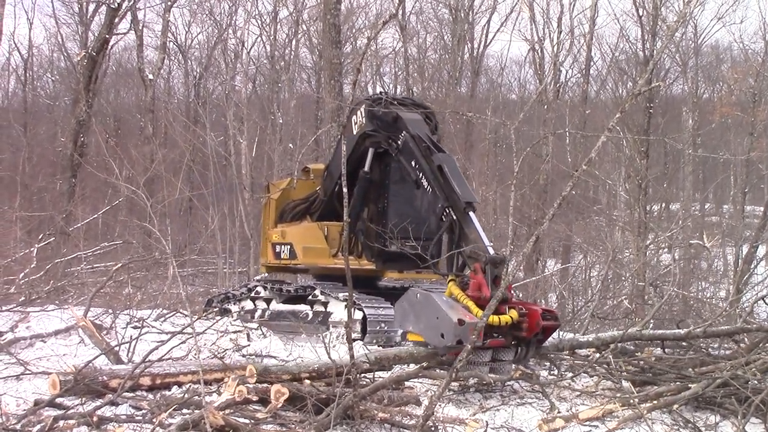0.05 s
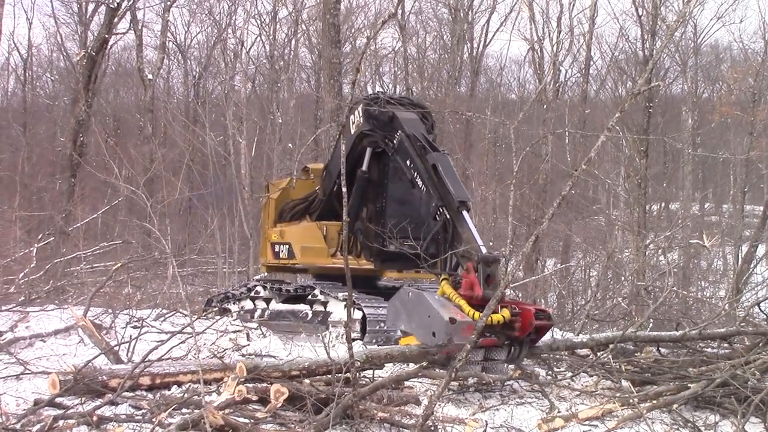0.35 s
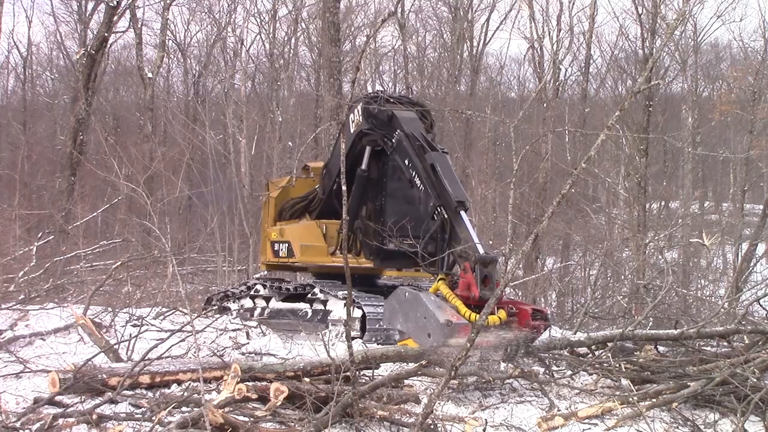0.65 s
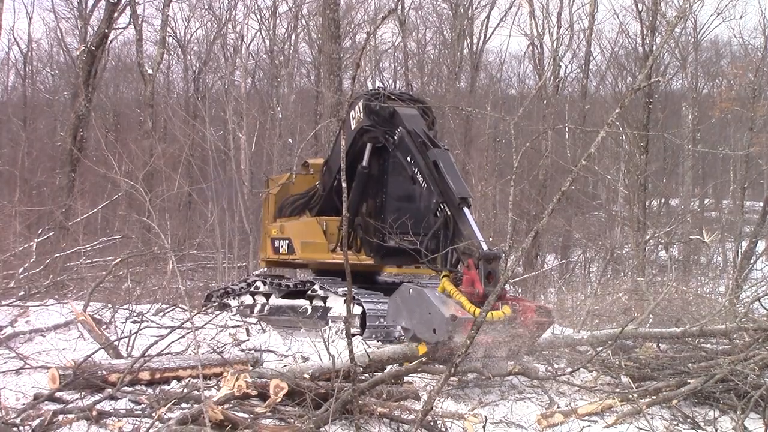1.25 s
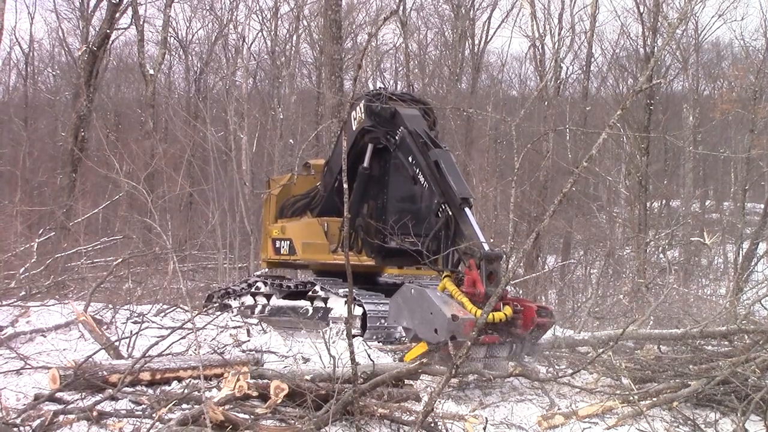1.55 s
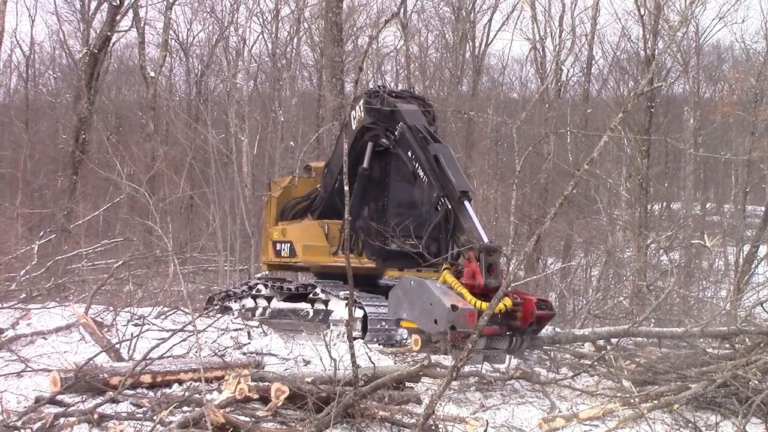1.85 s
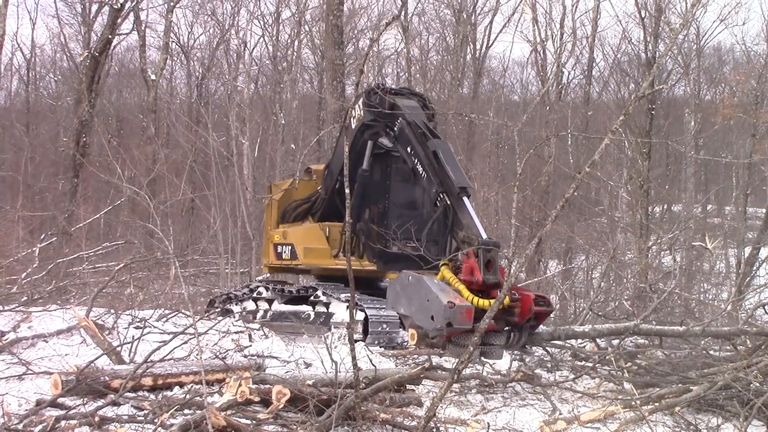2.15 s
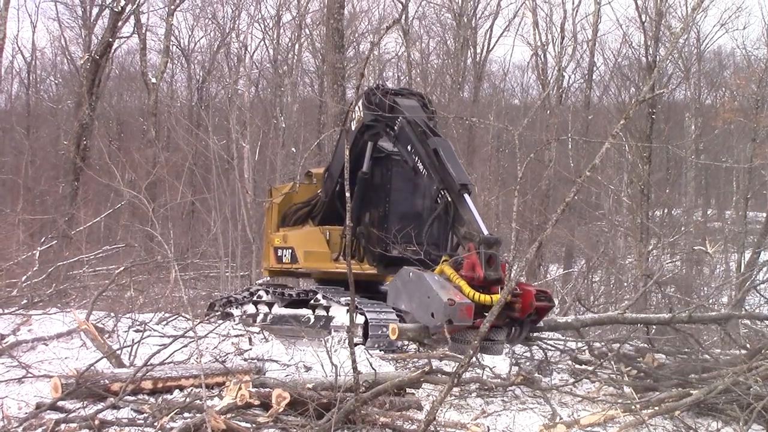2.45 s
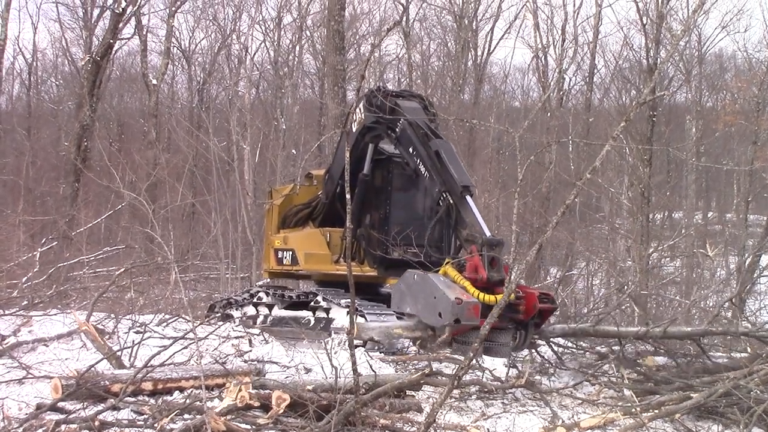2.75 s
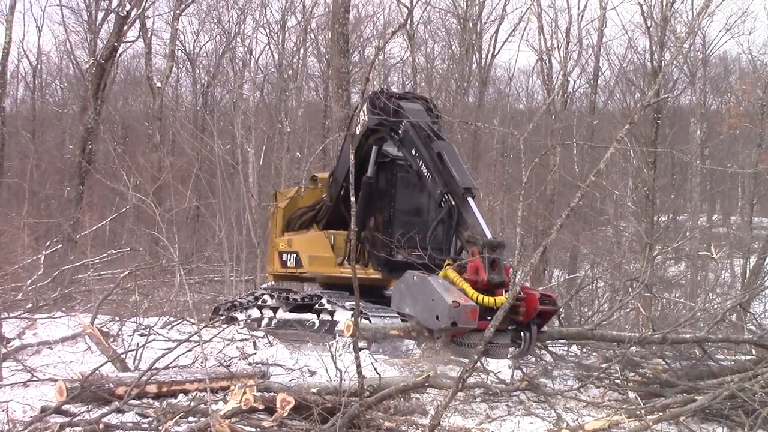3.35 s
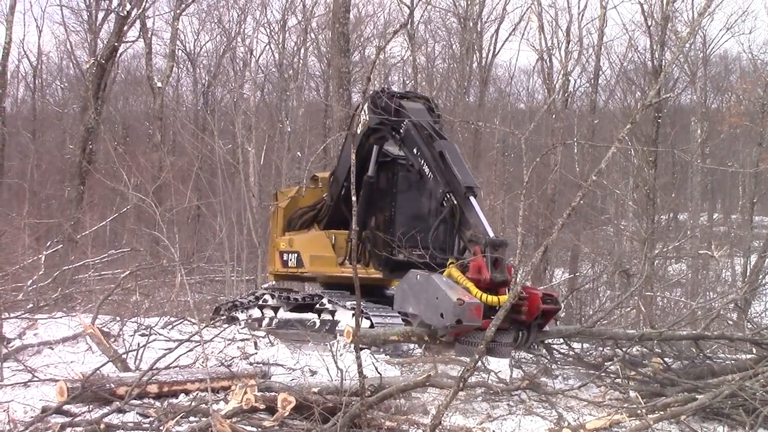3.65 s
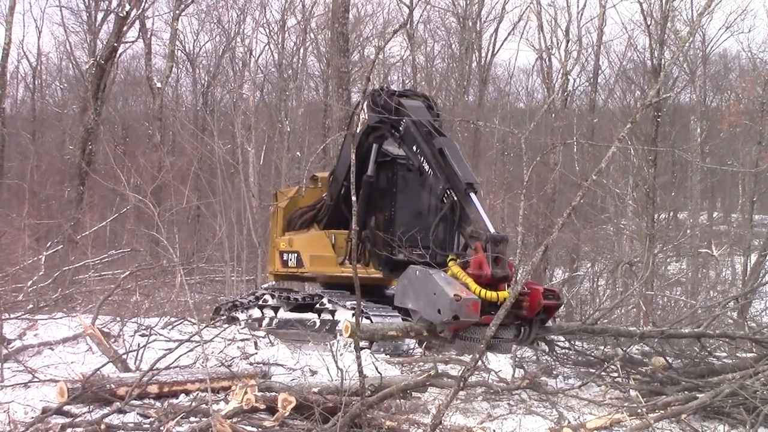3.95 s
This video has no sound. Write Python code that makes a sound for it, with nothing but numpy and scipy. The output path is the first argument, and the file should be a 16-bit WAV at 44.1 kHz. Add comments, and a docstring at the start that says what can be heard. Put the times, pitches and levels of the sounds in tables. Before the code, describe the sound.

A tree harvester saws a trunk some way off outdoors, its diesel engine clattering and droning throughout. The chain saw rasps, whines loudest from 0.6 to 1.4 seconds and runs down by 2; a log thumps softly near 1.3. From 2.3 seconds bark scrapes, limbs crunch and twigs snap sharply, densest before 3, echoing faintly. A faint hydraulic whistle and thin squeaks, about four a second, accompany the stripping.

```python
"""At a forest edge, some way off, a tracked harvester cuts up a tree. Its chain saw whines through
the trunk, throws chips and runs down, and the cut log thumps to the ground. Then rollers feed the
trunk through the knives: bark scrapes, limbs crunch, twigs snap, oil whistles in the valves and
something squeaks thinly about four times a second. The diesel engine clatters and drones
all the while, and the trees give a faint echo."""
import sys
import numpy as np
from scipy import signal
from scipy.fft import rfft, irfft, next_fast_len
from scipy.io import wavfile
from scipy.ndimage import map_coordinates

SR = 44100
rng = np.random.default_rng(int(sys.argv[2]) if len(sys.argv) > 2 else 0)


def to_wav(s):
    """Save 16-bit WAV."""
    ch = np.atleast_2d(s).T  # columns
    pcm = np.round(np.clip(ch, -1, 1) * 32767)  # PCM
    wavfile.write(sys.argv[1], SR, pcm.astype(np.int16))


N = 176400  # 4 seconds

# bark scraping through the knives: time_s, level_db
FEED_LEVEL = [(1.9, -30.5), (2.1, -35.5), (2.28, -36.5), (2.44, -25.5), (2.53, -25.5), (2.62, -23.5),
              (2.75, -26), (2.81, -23.5), (2.97, -23.5), (3.08, -25), (3.18, -24), (3.34, -22.5),
              (3.42, -26), (3.5, -21.5), (3.62, -19.5), (3.7, -26.5), (3.83, -30), (4, -35.5)]


def chain_saw():
    """The cutters whine at the rate they pass, tear the wood, ring the saw's bar and spray chips."""
    # the running chain: time_s, cutters_per_s, whine_db
    chain = [(0, 322, -35), (.15, 345, -29), (.24, 368, -34), (.36, 356, -31), (.44, 297, -30),
             (.5, 297, -26), (.545, 335, -30), (.57, 350, -16.5), (.66, 368, -16), (.87, 376, -14.5),
             (.96, 380, -16.5), (1.0, 380, -22.5), (1.21, 386, -26.5), (1.27, 398, -20),
             (1.355, 418, -18.5), (1.37, 420, -38), (1.52, 400, -28), (1.56, 345, -33), (1.61, 292, -29),
             (1.68, 275, -44), (2.0, 220, -70)]
    # the whine's tones at 1, 2, 3 and 4 times the cutter rate: gain_db
    harmonics = [-22, 0, -14.5, -19]
    # wood tearing in the cut: time_s, level_db
    cut_level = [(0, -24.5), (.15, -20), (.32, -20.5), (.45, -17.5), (.93, -18), (1.02, -26), (1.13, -25),
                 (1.25, -23), (1.45, -22.5), (1.55, -27.5), (1.78, -31.5), (1.95, -36), (2.08, -47.5),
                 (2.3, -42)]
    # tone of the tearing: pitch_hz, gain_db
    cut_tone = [(150, -28), (400, -25), (600, -5), (800, -6), (920, -5.5), (1100, 0), (1350, -5),
                (1700, -2.5), (2200, -1.5), (2800, 0), (3700, -6.5), (4500, -10.5), (7000, -3.5),
                (16000, -52)]
    # ringing of the bar and its housing: pitch_hz, width_hz, gain_db
    bar_rings = [(440.6, 16.6, -2.5), (591, 21, 2), (696, 50, -2), (830.5, 15.7, 4.5), (1106, 43, 0),
                 (1592, 100, 0), (1940, 55, -17)]
    # hiss of chain and chips: time_s, relative_db
    spray_level = [(0.0, -19.5), (0.09, -19), (0.13, -14), (0.27, -11), (0.48, -19), (0.62, -12),
                   (0.95, -14.5), (1.01, -22), (1.13, -25.5), (1.41, -19), (1.61, -28.5), (1.72, -25.5),
                   (1.775, -20), (1.81, -25), (1.99, -34.5), (2.12, -60)]
    # tone of that hiss: pitch_hz, gain_db
    spray_tone = [(1000, -53), (3000, -7.5), (4700, -10.5), (5700, -3), (6900, -1.5), (7500, 0), (8900, 2),
                  (11300, -3), (13000, -12), (16000, -17)]
    # harsh rasp as the cutters bite in and break through: time_s, level_db
    rasp_level = [(0, -42), (.32, -28), (.39, -17), (.44, -14.5), (.5, -60.5), (.95, -24.5), (1.1, -28),
                  (1.3, -28), (1.42, -25), (1.53, -34), (1.68, -27), (2.0, -49), (2.3, -80)]
    # ringing in the rasp: pitch_hz, width_hz, gain_db
    rasp_rings = [(1370, 360, -5), (1890, 144, 1.5), (2350, 130, 3), (2650, 650, -3.5), (3550, 460, -2.5)]
    sing_hz, sing_width_hz, sing_db = 1578, 44, 18.5
    rate = curve(chain)
    phase = 2 * np.pi * np.cumsum(rate * (1 + .007 * wobble(70.1))) / SR
    whine = np.zeros(N)
    for k, db in enumerate(harmonics, 1):
        # the bar sings along when a tone comes near its own pitch
        boost_db = sing_db / (1 + ((k * rate - sing_hz) / sing_width_hz) ** 2)
        whine += amp(db + boost_db + 1.6 * wobble(45)) * np.sin(k * phase)
    bites = 1 + .4 * np.cos(phase)  # one pulse for each cutter
    wood = coloured(bites * crackle(per_s=2000, spread_db=3, share=.32), cut_tone)
    bar = amp(-3) * ringing(rng.standard_normal(N), bar_rings)
    chips = reflections(coloured(bites * crackle(per_s=6000, spread_db=3, share=.3), spray_tone))
    run_out = np.interp(clock(), [2.15, 2.4], [1, 0])  # the chain comes to rest
    rasp = ringing(bites * rng.standard_normal(N), rasp_rings)
    return (amp(curve(chain, column=2)) * whine
            + amp(curve(rasp_level)) * rasp
            + amp(curve(cut_level) + .8 * wobble(39.2)) * (wood + bar)
            + amp(curve(spray_level) - .5 + .93 * wobble(58.7)) * run_out * chips)


def bark():
    """Bark crackles under the rollers and knives."""
    # tone of the bark: pitch_hz, gain_db
    bark_tone = [(150, -71), (350, -19), (700, -4), (900, -6), (1200, 3.5), (1430, 0), (1680, 5), (2000, 2),
                 (3000, 4.5), (4200, 1.5), (5200, -3.5), (6500, -0.5), (10500, -6.5), (13000, -17.5),
                 (16000, -37)]
    loudness = amp(curve(FEED_LEVEL) + 1.7 * wobble(70))
    return loudness * coloured(crackle(per_s=1100, spread_db=4, share=.52), bark_tone)


def limbs():
    """A limb tears as many fibres break in a row, with a dull thud from the trunk."""
    # limbs torn off by the knives: start_s, length_s, level_db, thud_relative_db
    crunches = [(2.539, 0.013, -15.5, -16), (2.565, 0.029, -18, -16), (2.7, 0.067, -22, -39),
                (2.829, 0.11, -19.5, -16), (2.897, 0.012, -27, -14), (3.217, 0.051, -15.5, -8.5),
                (3.273, 0.03, -15, -12), (3.633, 0.011, -19, -8), (3.862, 0.025, -22, -8)]
    # tone of the breaking fibres: pitch_hz, gain_db
    fibre_tone = [(150, -58), (500, -26), (900, -35), (1200, -8), (1700, 2), (2050, -0.5), (2900, 5),
                  (4000, 1.5), (4700, -2), (6600, -3), (9000, -6.5), (11000, -13), (13000, -25),
                  (16000, -33)]
    # tone of the thud: pitch_hz, gain_db
    thud_tone = [(30, -30), (150, -34), (300, -17), (550, 14), (800, 6), (1250, 11.5), (2000, -26),
                 (6000, -45)]
    rise_s, fall_s = .007, .012
    tear, thud = np.zeros(N), np.zeros(N)
    for start_s, length_s, db, thud_db in crunches:
        age = clock() - start_s
        shape = np.clip(age / rise_s, 0, 1) * np.exp(-np.maximum(age - length_s, 0) / fall_s)
        tear += amp(db) * shape
        thud += amp(db + thud_db) * shape
    fibres = coloured(crackle(per_s=2500, spread_db=2, share=.39), fibre_tone) * amp(1.8 * wobble(200))
    return tear * fibres + thud * coloured(rng.standard_normal(N), thud_tone)


def snaps():
    """A stick cracks sharply, then rings briefly; thin twigs sound higher than branches."""
    # twigs and branches snapping: start_s, level_db, pitch_hz
    sticks = [(2.302, -21.5, 3840), (2.447, -16.5, 7000), (2.467, -23.5, 1290), (2.546, -13, 2110),
              (2.550, -10.5, 6530), (2.569, -10.5, 1680), (2.573, -6, 5500), (2.580, -8, 6360),
              (2.592, -14, 3470), (2.657, -13, 6500), (2.686, -7, 3030), (2.689, -6.5, 6400),
              (2.709, -14, 2980), (2.7135, -12.5, 4420), (2.736, -11, 8970), (2.774, -12, 8300),
              (2.861, -8, 2290), (2.902, -6.5, 3000), (2.905, -14, 1690), (3.228, -12, 2900),
              (3.445, -14, 7540), (3.607, -13.5, 1200), (3.610, -14, 2300), (3.642, -17, 5000),
              (3.735, -20, 6890)]
    crack_s, ring_cycles = .0022, 10
    out, t = np.zeros(N + 2048), np.arange(2048) / SR
    freqs = np.fft.rfftfreq(len(t), 1 / SR) + 1
    for start_s, db, hz in sticks:
        band = np.exp(-.5 * np.log2(freqs / hz) ** 2)
        crack = unit(irfft(rfft(rng.standard_normal(len(t))) * band)) * np.exp(-t / crack_s)
        pitches = hz * (1 + .07 * rng.standard_normal((3, 1)))
        tones = np.sin(2 * np.pi * (pitches * t + rng.random(pitches.shape)))
        ring = unit(tones.sum(axis=0)) * np.exp(-t * hz / ring_cycles)
        out[round(start_s * SR):][:len(t)] += amp(db) * (crack + amp(-5) * ring)
    return thin_wood(out[:N])


def twigs():
    """Small twigs tick at random times and pitches, louder when the bark scrapes harder."""
    tries, ticks_per_s = 600, 100
    middle_hz, octaves, ring_cycles = 5200, 2.5, 9
    out, t = np.zeros(N + 512), np.arange(512) / SR
    loudness = 2 * amp(curve(FEED_LEVEL) + 5)
    for when, chance, pitch, size in rng.random((tries, 4)):
        if chance < ticks_per_s * N / SR / tries:
            start = int(when * N)
            hz = middle_hz * 2 ** (octaves * (pitch - .5))
            tick = np.exp(-t * hz / ring_cycles) * np.sin(2 * np.pi * hz * t)
            out[start:start + len(t)] += loudness[start] * size ** 2 * tick
    return thin_wood(out[:N])


def diesel():
    """Each firing of the engine rattles its casing; underneath, the machine drones."""
    # strength of each cylinder's knock: gain_db
    cylinders = [2.5, -2, 1.5, -2.5, 2, -1.5]
    # ringing of the casing: pitch_hz, width_hz, gain_db
    casing_rings = [(1680, 114, -5), (2402, 72, 3), (2784, 89, 2.5), (2907, 63, 7), (3288, 57, 3.5),
                    (3474, 56, 0.5), (3734, 77, 1.5), (4390, 130, -7), (6030, 410, -10), (7230, 260, -8.5)]
    # the engine's clatter: time_s, level_db
    clatter_level = [(0, -31), (1.7, -45.5), (2.0, -29), (2.16, -34.5), (2.35, -28.5), (2.7, -24.5),
                     (3.0, -22.5), (3.15, -31.5), (3.4, -25), (3.75, -30), (4, -36.5)]
    # the low drone: time_s, relative_db
    drone_level = [(0.0, -29.5), (0.34, -26), (0.38, -22), (0.92, -31.5), (1.08, -39), (1.25, -32.5),
                   (1.46, -33), (1.57, -38), (1.97, -39), (2.13, -47), (3.21, -34), (3.23, -30.5),
                   (3.41, -40), (3.54, -29.5), (3.59, -34), (4.0, -31)]
    # tone of the drone: pitch_hz, gain_db
    drone_tone = [(25, -50), (120, -32), (200, -28.5), (260, -9.5), (320, 0.5), (430, -0.5), (520, -1.5),
                  (700, 0.5), (900, -5.5), (2000, -2.5), (8000, -54)]
    firing_hz, knock_s = 96.7, .0042
    firings = clock() * firing_hz
    knock_db = np.array(cylinders)[firings.astype(int) % len(cylinders)] + 2 * wobble(90)
    knocks = amp(knock_db) * np.exp(-(firings % 1) / firing_hz / knock_s)
    clatter = ringing((knocks + .15) * rng.standard_normal(N), casing_rings)
    drone = coloured(rng.standard_normal(N), drone_tone) * amp(2 * wobble(24.87))
    return amp(curve(clatter_level)) * clatter + amp(curve(drone_level) + 2) * drone


def oil_valves():
    """A hoarse whistle wanders with the flow of oil."""
    # oil whistling through the feed valves: time_s, pitch_hz, level_db
    whistle = [(1.8, 3480, -52), (2.05, 3516, -40), (2.28, 3600, -35), (2.42, 3280, -43), (2.7, 3530, -34),
               (3.15, 3270, -37), (3.4, 3440, -34), (3.75, 3270, -29), (4, 3170, -51)]
    hoarseness = noise_band(pitch_hz=0, width_hz=125)
    tone = np.sin(2 * np.pi * np.cumsum(curve(whistle)) / SR)
    return amp(curve(whistle, column=2)) * unit(hoarseness * tone)


def squeaks():
    """Short, hoarse, very high squeaks come while the rollers turn."""
    # thin squeaks: start_s, pitch_hz, level_db
    squeak_list = [(2.45, 12500, -48), (2.647, 13100, -43), (3.122, 12700, -35), (3.38, 12850, -32.5),
                   (3.623, 12800, -30.5), (3.852, 12650, -34.5)]
    rise_s, fall_s = .005, .013
    out = np.zeros(N)
    for start_s, hz, db in squeak_list:
        age = np.maximum(clock() - start_s, 0)
        shape = (1 - np.exp(-age / rise_s)) * np.exp(-age / fall_s)
        out += amp(db) * shape / shape.max() * noise_band(hz, width_hz=380)
    return out


def log_drop():
    """The cut log falls into the snow with a soft thump."""
    # tone of the thump: pitch_hz, gain_db
    thump_tone = [(30, -25), (110, -16), (300, 1), (480, 2), (1000, -28)]
    start_s, rise_s, fall_s = 1.255, .01, .04
    age = np.maximum(clock() - start_s, 0)
    shape = 2 * (1 - np.exp(-age / rise_s)) * np.exp(-age / fall_s)
    return amp(-33.5) * shape * coloured(rng.standard_normal(N), thump_tone)


def reflections(x, count=14):
    """Nearby trunks and the ground add weak, slightly late copies of the sound."""
    gain, spread_s = amp(-9), .035
    out = x.copy()
    for delay, sign in zip(rng.random(count), rng.choice([-1, 1], count)):
        late = np.pad(x, (int(SR * spread_s * (delay + .1)), 0))[:N]
        out += gain * sign / np.sqrt(count) * late
    return out / np.sqrt(1 + gain ** 2)


def blurred(x):
    """Smear x into a soft tail that fades over half a second."""
    fade_db_per_s = 100
    t = np.arange(SR // 2) / SR
    tail = rng.standard_normal(len(t)) * amp(-fade_db_per_s * t)
    return signal.fftconvolve(x, tail / np.linalg.norm(tail))[:N]


def thin_wood(x):
    """Thin wood gives off almost no bass, and distance dulls its highest treble."""
    band_hz = (700, 10500)
    return signal.sosfilt(signal.butter(2, band_hz, "bandpass", fs=SR, output="sos"), x)


def crackle(per_s, spread_db, share):
    """Tiny breaks of uneven size carry a share of the power; the rest is plain hiss."""
    breaks = (rng.random(N) < per_s / SR) * rng.choice([-1, 1], N)
    sizes = amp(spread_db * np.minimum(rng.exponential(size=N), 3))
    return np.sqrt(share) * unit(breaks * sizes) + np.sqrt(1 - share) * rng.standard_normal(N)


def ringing(x, rings):
    """Let x ring an object at its own pitches; the result has strength 1."""
    def response(f):
        return sum((-1) ** k * amp(db) * 1j * f * width / (hz * hz - f * f + 1j * f * width)
                   for k, (hz, width, db) in enumerate(rings))
    return unit(filtered(x, response))


def coloured(x, tone):
    """Shape the bass and treble of x with a tone table; the result has strength 1."""
    hz, db = np.transpose(tone)
    return unit(filtered(x, lambda f: amp(np.interp(np.log(f + 1), np.log(hz), db))))


def noise_band(pitch_hz, width_hz):
    """Noise close to one pitch, at strength 1."""
    noise = rng.standard_normal(N)
    return unit(filtered(noise, lambda f: np.exp(-.5 * ((f - pitch_hz) / width_hz) ** 2)))


def filtered(x, response):
    """Turn each frequency of x up or down by response(frequency)."""
    size = next_fast_len(N + 8192)
    return irfft(rfft(x, size) * response(np.fft.rfftfreq(size, 1 / SR)), size)[..., :N]


def wobble(per_s):
    """A smooth curve through per_s random values a second."""
    return map_coordinates(rng.standard_normal(4096), [clock() * per_s + 2], mode="mirror")


def curve(rows, column=1):
    """Join one column's points with straight lines over time."""
    columns = np.transpose(rows)
    return np.interp(clock(), columns[0], columns[column])


def clock():
    """The time of every sample, in seconds."""
    return np.arange(N) / SR


def unit(x):
    """Scale x to an average strength (rms) of 1."""
    return x / np.sqrt(np.mean(x ** 2) + 1e-20)


def amp(db):
    """Turn decibels into a gain."""
    return 10 ** (np.asarray(db) / 20)


def scene():
    """The machine stands straight ahead; the treble is very slightly wider in stereo."""
    # ringing of the struck trunk: pitch_hz, width_hz, gain_db
    trunk_rings = [(1187, 57, -5.5), (1690, 106, 5), (6455, 82, 1)]
    breaks = limbs() + snaps()
    breaks += amp(-7) * breaks.std() * ringing(breaks, trunk_rings)
    work = reflections(diesel() + oil_valves() + bark() + twigs() + squeaks()) + breaks
    middle = work + chain_saw() + log_drop()
    middle += amp(-13) * blurred(breaks)  # the trees echo the breaking wood
    treble = lambda f: np.interp(f, [1630, 3260, 4360, 7000], [0, .3, 1.4, 1.6])
    side = amp(-21.5) * filtered(blurred(work), treble)
    return np.array([middle + side, middle - side])


def record(dry):
    """Round off the highest peaks, turn down the bass and remove the very top of the treble."""
    # the microphone's bass cut: pitch_hz, gain_db
    bass_cut = [(25, -7), (110, -8), (170, -2.5), (240, -0.5)]
    ceiling, top_hz = .95, 15950
    hz, db = np.transpose(bass_cut)
    rounded = dry / (1 + np.abs(dry / ceiling) ** 10) ** (1 / 10)
    return filtered(rounded, lambda f: amp(np.interp(f, hz, db)) * (f < top_hz))


dry = scene()
out = record(dry)
to_wav(out)
```